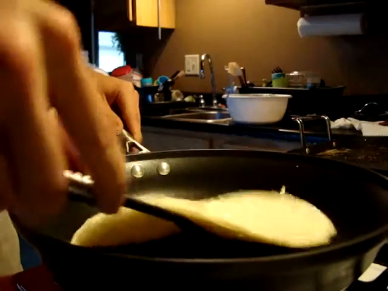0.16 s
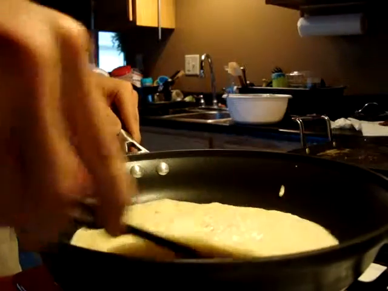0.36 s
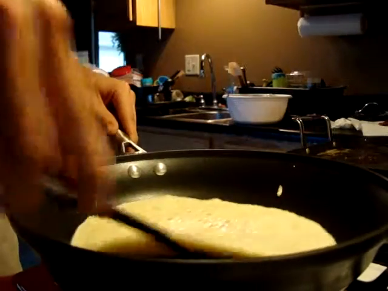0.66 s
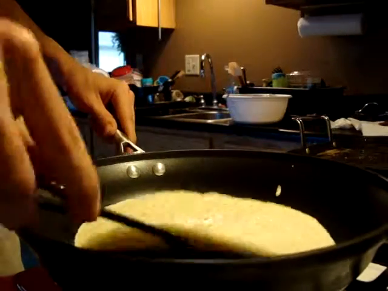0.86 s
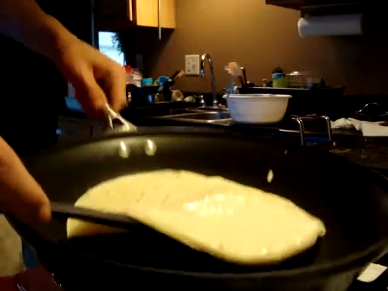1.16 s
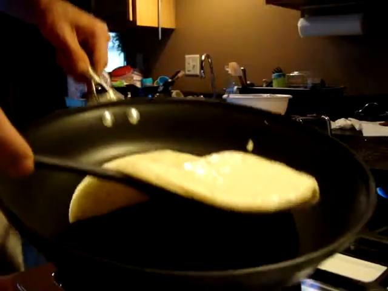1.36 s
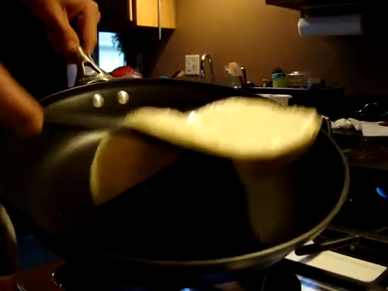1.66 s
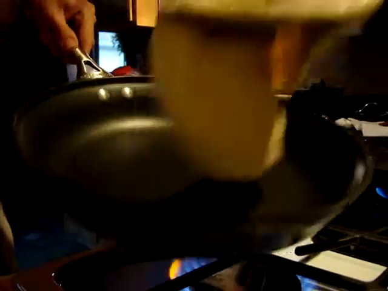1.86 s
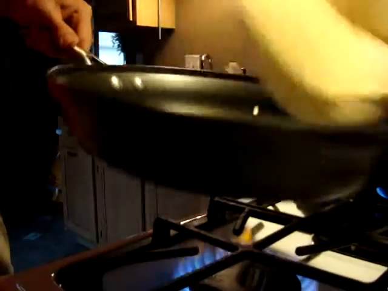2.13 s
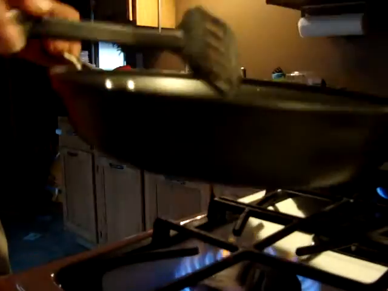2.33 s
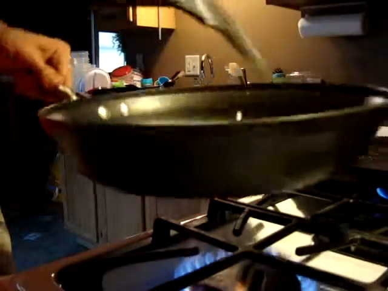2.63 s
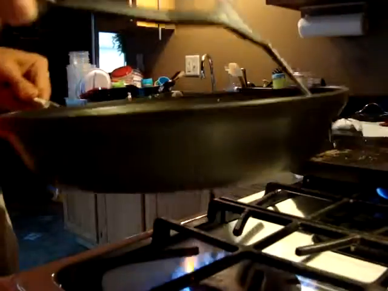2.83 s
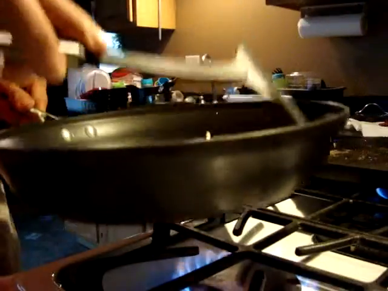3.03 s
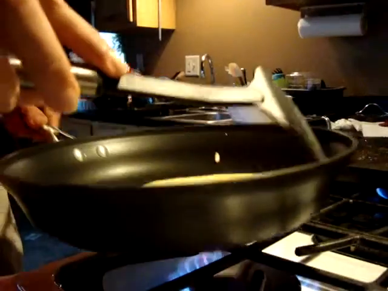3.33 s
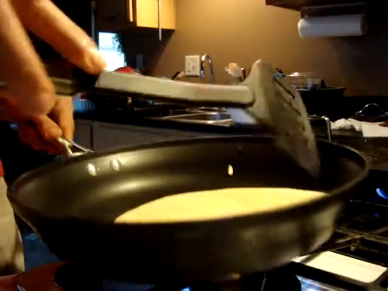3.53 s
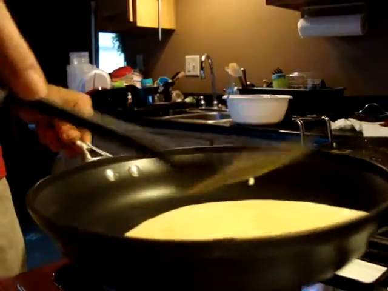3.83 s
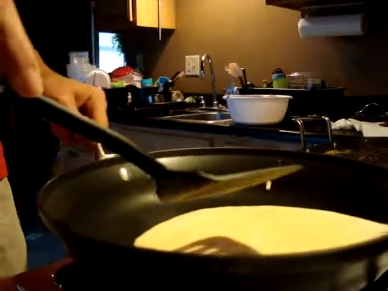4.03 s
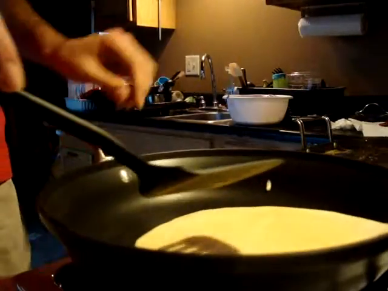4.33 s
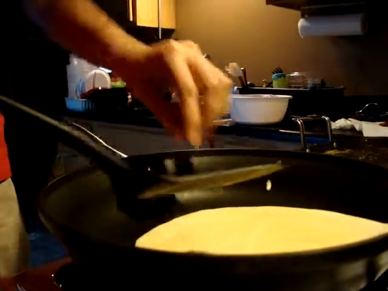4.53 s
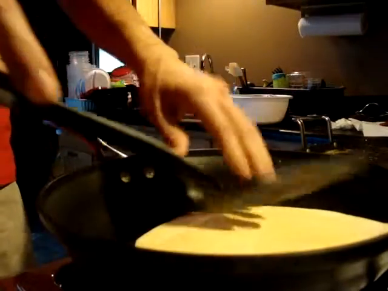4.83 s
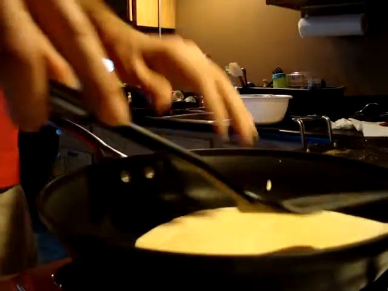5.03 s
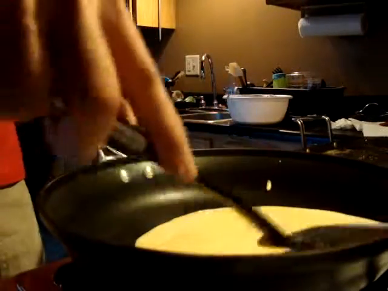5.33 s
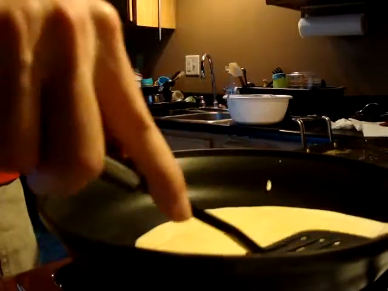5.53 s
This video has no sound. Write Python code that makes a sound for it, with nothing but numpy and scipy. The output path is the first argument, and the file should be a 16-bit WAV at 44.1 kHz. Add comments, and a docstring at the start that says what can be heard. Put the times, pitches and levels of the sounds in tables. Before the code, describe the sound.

A plastic spatula scrapes under a pancake, which slaps down, then the frying pan clatters onto a stove grate over a hissing gas burner.

```python
"""Flipping a pancake

A spatula's plastic blade brushes, squeaks, knocks and scrapes under a pancake, making the frying pan
ring and groan. The pan is lifted off a gas stove, the flipped pancake slaps down and the spatula's steel
neck clinks on the rim. The pan bumps onto the iron grate and is shoved into place. Behind it all the
burner hisses and the batter sizzles faintly, heard through one close microphone in a small kitchen."""
import sys
import numpy as np
from scipy import signal
from scipy.fft import rfft, irfft
from scipy.io import wavfile
from scipy.ndimage import uniform_filter1d

SR = 44100
rng = np.random.default_rng(int(sys.argv[2]) if len(sys.argv) > 2 else 0)


def bounce(signal):
    """Save signal as a 16-bit WAV file at the path given by the first command-line argument."""
    frames = np.transpose(np.atleast_2d(signal))
    limited = np.clip(frames, -1, 1)
    pcm = np.round(limited * 32767).astype(np.int16)
    wavfile.write(sys.argv[1], SR, pcm)


N = 250485
TIME = np.arange(N) / SR

# A TONE is a sound's broad shape, PEAKS are pitches that stand out of it, and MODES ring on after a hit.
# Their levels only set the balance within one sound.
# how long the kitchen echoes: (frequency [Hz], time to fade by 60 dB [s])
ROOM_FADE = [(100, 0.98), (500, 0.34), (2000, 0.38), (5000, 0.38), (10000, 0.33)]
# the flame's roar in the kitchen: (frequency [Hz], level [dB])
BURNER_TONE = [(20, -1.5), (60, -9), (100, -7.5), (195, -22), (320, -6), (560, 1), (800, -4.5),
               (1250, -12.5), (2000, -11), (3300, -15), (4800, -18.5), (7000, -23), (10000, -25)]
# pitches in that roar: (frequency [Hz], width [Hz], level [dB])
BURNER_PEAKS = [(143.2, 38, -0.5), (240.5, 46, 2.5), (462, 33, 1), (622, 36, 0.5), (3950, 230, -11)]
# the gas jet's hollow hiss: (frequency [Hz], width [Hz], level under the pan [dB], rise when lifted [dB])
JET_HISSES = [(2508, 160, -54.5, 8), (2856, 160, -55.5, 1.5)]
# the soft noise around each hiss: (frequency [Hz], level [dB])
JET_TONE = [(100, -59), (2600, -16), (10000, -50)]

# pan and grate together: (frequency [Hz], level [dB])
GRATE_TONE = [(50, -27.5), (120, -34), (300, -22), (550, -20), (1100, -9.5), (1900, -15), (2700, -22),
              (5500, -20), (7500, -27.5), (10000, -34)]
# pitches of the pan on the grate: (frequency [Hz], width [Hz], level [dB])
GRATE_PEAKS = [(150.7, 24, -10), (250.4, 30, -7), (365, 18, -6.5), (456, 12.6, -3.5), (627, 97, 1),
               (788, 86, 0.5), (932, 79, -3.5), (1346, 160, -3), (1637, 51, 0), (2096, 290, -10),
               (2510, 81, -10), (3050, 170, -10.5), (3474, 230, -12), (4350, 200, -17), (4920, 110, -14.5),
               (5540, 300, -22.5), (6700, 150, -27), (7720, 150, -26), (9100, 120, -33)]
# squeals heard only while the pan slides: (frequency [Hz], width [Hz], level [dB])
SLIDE_PEAKS = [(3460, 70, -12), (5750, 170, -10.5)]
# the grate ringing on: (frequency [Hz], level [dB], time to fade by 60 dB [s])
GRATE_MODES = [(410, -8.5, 1), (456.5, 1.5, 0.44), (503, 3, 0.59), (620, -0.5, 0.26), (755, 0.5, 0.49),
               (795, -2.5, .3), (1250, -16, .35), (1647, -13, .35)]
# the pan bumps on the grate: (time [s], level [dB], brightness [dB per octave], rattle time [s])
BUMPS = [(3.722, -9, 0, 0.0064), (3.729, -8.5, 2, .005), (3.765, -20, -4, 0.017), (3.81, -12.5, -3, .008),
         (3.874, -15, -2, 0.015), (4.016, -19, -15, .008), (4.03, -6.5, 1.5, 0.0045),
         (4.176, -22.5, -7.5, 0.012), (4.208, -14, -2, 0.0019), (4.215, -10.5, -0.5, .011)]

# the spatula's steel neck ringing: (frequency [Hz], level [dB], time to fade by 60 dB [s])
NECK_MODES = [(523, -3, 0.058), (609, -2.5, 0.038), (1403, -9, 0.17), (1628, -14.5, 0.17),
              (1980, -7.5, 0.21), (2610, -16, 0.38), (3060, -12, .06), (3500, -18, 0.27), (3880, -19, .13),
              (4680, -25, 0.16), (5800, -23, .12)]
# the neck taps the rim:
# (time [s], level [dB], brightness [dB per octave], boosted frequency [Hz], boost [dB])
CLINKS = [(3.014, -23, -2.5, 1389, 5), (5.35, -35, 6.5, 1630, 16)]

# wet batter hitting metal: (frequency [Hz], level [dB])
SLAP_TONE = [(50, -57), (110, -37), (240, -15.5), (400, -18.5), (800, -12), (1500, -10.5), (2400, -14),
             (3400, -7), (4700, -13.5), (7200, -19.5), (10000, -19.5)]
# pitches in the slap: (frequency [Hz], width [Hz], level [dB])
SLAP_PEAKS = [(670, 98, -3), (1160, 80, 0.5), (6200, 220, -8.5), (8140, 300, -13.5)]
# the pancake lands, edge first, then flat:
# (time [s], level [dB], brightness [dB per octave], splatter time [s])
SLAPS = [(2.35, -9, -3, 0.0057), (2.3674, -8, 0.5, 0.005)]

# the pan muffled by the pancake: (frequency [Hz], level [dB])
BRUSH_TONE = [(60, -22), (150, -3.5), (400, -17.5), (800, -0.5), (1300, -4), (1800, -9), (2700, -9.5),
              (3700, -10.5), (5000, -11.5), (7000, -14), (10000, -21)]
# blade and pancake brush the pan:
# (start [s], rise time [s], time to fade by 60 dB [s], low rub [dB], high rasp [dB])
BRUSHES = [(0, 0.14, 0.71, -40, -42.5), (.45, 0.083, 0.37, -39, -48.5), (.63, 0.034, 0.54, -41.5, -40),
           (.76, 0.049, 1, -45.5, -47.5), (1.013, 0.071, 0.87, -31, -33), (1.85, 0.053, 0.09, -45.5, -37),
           (2.15, 0.12, 0.21, -50, -46), (2.29, 0.029, 0.038, -40.5, -38.5),
           (5.45, 0.044, 0.19, -46.5, -50)]
# the plastic edge chirps:
# (time [s], level [dB], pitch [Hz], width [Hz], rattle time [s], fizz compared with the chirp [dB])
SQUEAKS = [(.526, -36, 4470, 350, 0.0043, -16), (1.138, -27, 1950, 109, 0.0071, -38),
           (3.076, -38, 5700, 400, 0.0068, -2)]
# the pan groans under the blade: (start [s], length [s], level [dB])
GROANS = [(1.165, 0.022, -20), (1.189, 0.037, -21.5), (1.231, 0.029, -20), (1.286, 0.069, -16.5),
          (1.342, .07, -21), (1.495, 0.11, -17.5), (1.638, 0.072, -21.5)]
# the pan under the blade: (frequency [Hz], level [dB])
PAN_TONE = [(60, -43), (120, -37.5), (195, -30), (310, -20), (400, -28), (560, -15), (1000, -18.5),
            (1450, -21.5), (2650, -26), (3500, -23.5), (5600, -24), (7500, -28), (10000, -35.5)]
# pitches of the pan under the blade: (frequency [Hz], width [Hz], level [dB])
PAN_PEAKS = [(160, 18, -17), (670, 34, 1), (900, 45, -8), (1080, 50, -15), (1272, 24, -8),
             (1640, 75, -12.5), (2000, 60, -15), (2390, 20, -10), (2985, 34, -4.5), (3308, 42, -6),
             (4150, 45, -13.5), (4330, 36, -15), (4650, 46, -5.5), (4980, 110, -16), (5620, 130, -16),
             (5840, 55, -7.5), (6760, 140, -22), (7240, 70, -18), (7748, 24, -17), (8000, 80, -21),
             (8450, 60, -24), (8658, 24, -19.5), (9700, 110, -25)]
# the pan ringing freely: (frequency [Hz], level [dB], time to fade by 60 dB [s])
PAN_MODES = [(269, -22, .6), (371, -20, 1), (420, -13, .3), (458, -11, .4), (530, -10, .3), (676, 0, .32),
             (834, -7, .24), (930, -8, .2), (1319, -23, 1.2), (1652, -15, .3), (2008, -11, .38),
             (2988, -22, .36), (3303, -14, .26), (4156, -12, .2), (4662, -16, .3), (5652, -12, .21),
             (5837, -11, .23), (6670, -17, .25), (8086, -24, .22)]
# the spatula knocks in the pan: (time [s], level [dB], top frequency [Hz], how bare the pan is [0 to 1])
KNOCKS = [(.389, -34, 4960, 0), (.4225, -34, 1950, 0.06), (.7095, -33, 2500, 0.02),
          (1.171, -19.5, 1510, 0.3), (1.2316, -17, 1600, 0), (1.567, -7.5, 3220, 0.79),
          (1.599, -14, 2570, 1), (1.647, -26.5, 4500, 0.56)]
# how the one long scrape swells and fades: (time [s], relative level of its rasp [dB])
SCRAPE_SHAPE = [(1.258, -63), (1.268, -38.5), (1.3, -26.5), (1.348, -26), (1.358, -21), (1.382, -22),
                (1.444, -15), (1.648, -25), (1.77, -56.5)]

RASP_POWER = 1.9  # the high rasp grows as this power of the force; the low rub just follows the force


def amp(db):
    """Turns decibels into a number to multiply by."""
    return 10 ** (np.asarray(db) / 20)


def unit(x):
    """Scales a signal to an average strength (rms) of one."""
    return x / np.sqrt(np.mean(x ** 2) + 1e-20)


def value_at(points, hz):
    """Reads a table between its points, along straight lines over log frequency."""
    f, value = np.transpose(points)
    return np.interp(np.log(hz + 1), np.log(f), value)


def band(x, low_hz, high_hz):
    """Keeps the sound between two frequencies."""
    return signal.sosfilt(signal.butter(3, [low_hz, high_hz], "band", fs=SR, output="sos"), x)


def through(x, response):
    """Plays x through an object, given that object's response to a single click."""
    return signal.fftconvolve(x, response)[:len(x)]


def fade(t, fade_s):
    """Falls from one by 60 dB every fade_s seconds."""
    return np.exp(-np.log(1000) * t / fade_s)


def swell(start_s, rise_s, hold_s, fade_s):
    """Rises smoothly to one, holds, then fades away."""
    age = TIME - start_s
    rise = np.sin(np.pi / 2 * np.clip(age / rise_s, 0, 1)) ** 2
    return rise * fade(np.maximum(age - rise_s - hold_s, 0), fade_s)


def wander(hz):
    """A smooth random wobble that changes up to about hz times a second."""
    f = np.fft.rfftfreq(N, 1 / SR)
    return unit(irfft(rfft(rng.standard_normal(N)) * np.exp(-(f / hz) ** 2), N))


def body(tone, peaks=(), tilt_db=0, size=16384):
    """An object's response to a click; tilt_db brightens it by that much per octave above 500 Hz."""
    f = np.fft.rfftfreq(size, 1 / SR)
    power = amp(value_at(tone, f)) ** 2
    for hz, width, db in peaks:
        power += amp(db) ** 2 / (1 + ((f - hz) / width) ** 2 * 2) ** 2
    tilt = amp(tilt_db * np.log2(np.maximum(f, 500) / 1000))
    log_gain = np.log(power) / 2 + np.log(tilt)
    mirrored = np.concatenate([log_gain, log_gain[-2:0:-1]])
    spectrum = np.exp(np.conj(signal.hilbert(mirrored)))  # nothing sounds before the click
    response = np.fft.ifft(spectrum).real[:size // 2]
    return response / np.linalg.norm(response)


def ring(modes):
    """One second of pure tones, each dying away at its own speed."""
    t = TIME[:SR]
    return sum((-1) ** k * amp(db) * np.sin(2 * np.pi * hz * t) * fade(t, fade_s)
               for k, (hz, db, fade_s) in enumerate(modes))


def grains(per_s, spread_db):
    """Tiny random clicks, a few of them much louder than the rest."""
    size = amp(spread_db * np.minimum(rng.exponential(1, N), 5)) * rng.choice([-1, 1], N)
    return unit(size * (rng.random(N) < per_s / SR))


def blow(rattle_s, hardness):
    """The force of a hit: a sharp push if it is hard, and a rattle that swells and dies away."""
    age = TIME[:SR] / rattle_s
    rattle = rng.standard_normal(SR) * np.sqrt(age) * np.exp(-age)
    return rattle / np.linalg.norm(rattle) + hardness * signal.unit_impulse(SR)


def struck(force, response, modes, ring_db):
    """A hit object gives a short thud and then rings on."""
    ringing = ring(modes)
    return through(force, response) + amp(ring_db) * through(force, ringing / np.linalg.norm(ringing))


def friction(strokes, response, slips):
    """Tiny slips shake an object in strokes of (force, rub [dB], rasp [dB]); more force is brighter."""
    rub = sum(amp(rub_db) * force for force, rub_db, _ in strokes)
    rasp = sum(amp(rasp_db) * force ** RASP_POWER for force, _, rasp_db in strokes)
    sound = through(slips, response)
    return rub * unit(band(sound, 50, 2700)) + rasp * unit(band(sound, 2700, 16000))


def add(mix, start_s, db, sound):
    """Adds a sound to the mix so that its loudest 5 milliseconds have the level db."""
    loudest = np.sqrt(uniform_filter1d(sound ** 2, 220).max())
    part = mix[round(start_s * SR):][:len(sound)]
    part += amp(db) * sound[:len(part)] / loudest


def kitchen(x):
    """Echoes from the walls build up quickly, and the low ones last longest."""
    hz, t, noise = signal.stft(rng.standard_normal(SR), SR, nperseg=256)
    fading = noise * fade(t, value_at(ROOM_FADE, hz)[:, None])
    echo = signal.istft(fading, SR, nperseg=256)[1][:SR]
    echo *= np.clip((TIME[:SR] - 0.003) / 0.0033, 0, 1)  # the first echoes take 3 ms to arrive
    return through(x, echo / np.linalg.norm(echo))


def burner():
    """The flame roars softly, and the gas jet hisses louder while the pan is lifted."""
    roar = through(rng.standard_normal(N), body(BURNER_TONE, BURNER_PEAKS))
    out = roar * amp(-42.5 + 1.3 * wander(7))
    lift = swell(start_s=1.34, rise_s=1.43, hold_s=0.29, fade_s=1.3)
    for hz, width, db, rise_db in JET_HISSES:
        hiss = through(rng.standard_normal(N), body(JET_TONE, [(hz, width, 0)]))
        out += hiss * amp(db + rise_db * lift)
    return out


def sizzle():
    """Tiny bursts of steam escape from the batter."""
    return amp(-64) * unit(band(grains(per_s=400, spread_db=5.3), 2500, 9500))


def grate():
    """The pan drops on the iron bars and is shoved into place, grinding after every bump."""
    slips = grains(per_s=8000, spread_db=2.4) * amp(2.2 * wander(130))
    shove = swell(start_s=3.76, rise_s=0.11, hold_s=0.24, fade_s=0.5)
    rub_db = rasp_db = -28
    out = friction([(shove, rub_db, rasp_db)], body(GRATE_TONE, GRATE_PEAKS + SLIDE_PEAKS), slips)
    grind = through(grains(per_s=8000, spread_db=2.3), body(GRATE_TONE, GRATE_PEAKS, tilt_db=-5))
    for start_s, db, tilt_db, rattle_s in BUMPS:
        iron = body(GRATE_TONE, GRATE_PEAKS, tilt_db)
        add(out, start_s, db, struck(blow(rattle_s, hardness=0.36), iron, GRATE_MODES, ring_db=-11.5))
        out += amp(db - 9.5) * swell(start_s, rise_s=0.031, hold_s=0, fade_s=0.23) * unit(grind)
    return out


def clinks():
    """The steel neck ticks on the rim and rings; the spot where it touches brings out one pitch."""
    out = np.zeros(N)
    for start_s, db, tilt_db, boost_hz, boost_db in CLINKS:
        modes = []
        for hz, mode_db, fade_s in NECK_MODES:
            nearness = np.exp(-((hz - boost_hz) / 120) ** 2)
            modes.append((hz, mode_db + tilt_db * np.log2(hz / 1000) + boost_db * nearness, fade_s))
        add(out, start_s, db, ring(modes))
        tick = through(blow(rattle_s=0.012, hardness=0.36), body(BRUSH_TONE, tilt_db=tilt_db))
        add(out, start_s, db - 15.5, tick)
    return out


def pancake():
    """Wet batter slaps on the hot metal."""
    out = np.zeros(N)
    for start_s, db, tilt_db, splatter_s in SLAPS:
        slap = through(blow(splatter_s, hardness=0.75), body(SLAP_TONE, SLAP_PEAKS, tilt_db))
        add(out, start_s, db, slap)
    return out


def brushing():
    """Where the pancake muffles the pan, rubbing makes only a dry rustle with no pitch."""
    slips = grains(per_s=4000, spread_db=1.7) * amp(2.2 * wander(80))
    strokes = [(swell(start_s, rise_s, 0, fade_s), rub_db, rasp_db)
               for start_s, rise_s, fade_s, rub_db, rasp_db in BRUSHES]
    return friction(strokes, body(BRUSH_TONE), slips)


def squeaks():
    """The plastic sticks and slips on the pan's coating, making short chirps with a fizz above them."""
    out = np.zeros(N)
    for start_s, db, hz, width, rattle_s, fizz_db in SQUEAKS:
        fizz = [(100, -35), (3500, -28), (5000, fizz_db), (10000, fizz_db - 12.5)]
        add(out, start_s, db, through(blow(rattle_s, hardness=0.1), body(fizz, [(hz, width, 0)])))
    return out


def groan():
    """The blade sticks and slips in step with the pan's strongest pitch, in short, shaky bursts."""
    bursts = sum(amp(db) * np.sin(np.pi * np.clip((TIME - start_s) / length_s, 0, 1))
                 for start_s, length_s, db in GROANS)
    pitch_hz = 668 * (1 + 0.0299 * wander(70.5))
    tone = np.sin(2 * np.pi * np.cumsum(pitch_hz) / SR)
    return bursts * amp(2 * wander(45)) * unit(tone)


def knocks():
    """The spatula's knocks are short and dull where the pancake lies, but ring on bare metal."""
    out = np.zeros(N)
    pan = body(PAN_TONE, PAN_PEAKS)
    for start_s, db, top_hz, bareness in KNOCKS:
        rattle_s = np.interp(bareness, [0, 1], [0.0033, 0.011])
        ring_db = np.interp(bareness, [0, 1], [-16.5, 2])
        push = band(blow(rattle_s, hardness=0.58), 40, top_hz)  # a cushioned hit has no treble
        add(out, start_s, db, struck(push, pan, PAN_MODES, ring_db))
    return out


def scraping():
    """In one long stroke, thousands of tiny slips of the blade shake the bare pan."""
    slips = grains(per_s=7000, spread_db=1.7) * amp(1.7 * wander(120))
    times, level_db = np.transpose(SCRAPE_SHAPE)
    shape_db = np.interp(TIME, times, level_db - level_db.max(), left=-np.inf, right=-np.inf)
    force = amp(shape_db / RASP_POWER)
    rub_db, rasp_db = -17.5, -15  # at full force
    return friction([(force, rub_db, rasp_db)], body(PAN_TONE, PAN_PEAKS), slips)


def scene():
    """Mixes all the sounds with the kitchen's echo, the same in both channels."""
    blade = brushing() + scraping() + knocks() + groan() + squeaks()
    slap, neck, iron = pancake(), clinks(), grate()
    echo = kitchen(amp(-10) * blade + amp(-9) * slap + amp(-7) * neck + amp(-11.5) * iron)
    mono = blade + slap + neck + iron + echo + burner() + sizzle()
    return np.array([mono, mono])


def record(dry):
    """The microphone rounds off the loudest peaks; then the highest treble is cut."""
    ceiling, cutoff_hz = 0.69, 10020
    rounded = dry / (1 + (dry / ceiling) ** 6) ** (1 / 6)
    low_pass = signal.firwin(511, cutoff_hz, window=("kaiser", 9), fs=SR)
    return signal.oaconvolve(rounded, low_pass[None], "same")


dry = scene()
out = record(dry)
bounce(out)
```